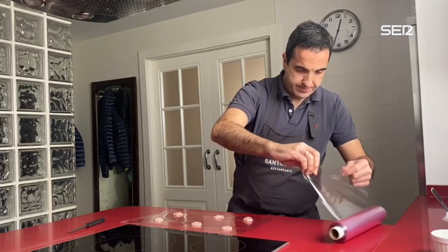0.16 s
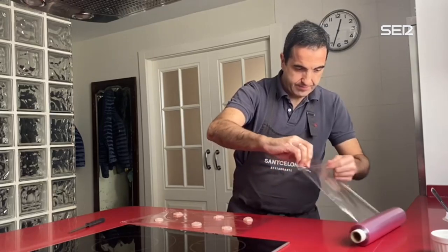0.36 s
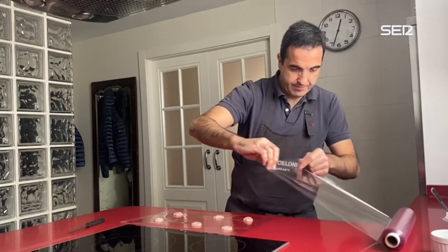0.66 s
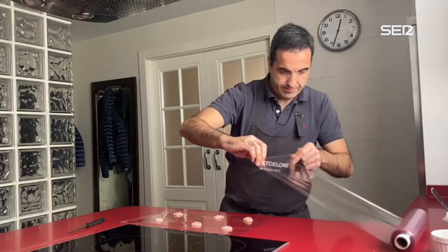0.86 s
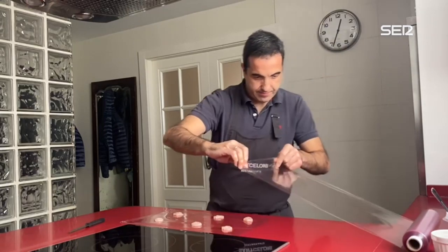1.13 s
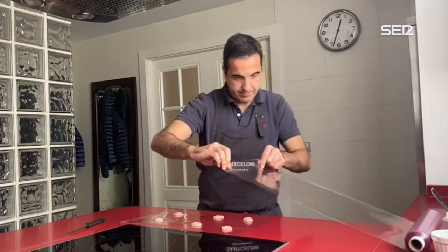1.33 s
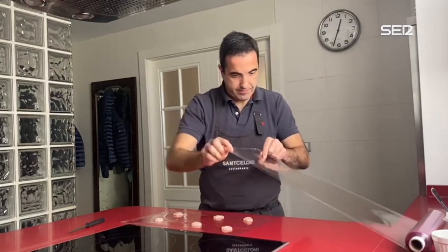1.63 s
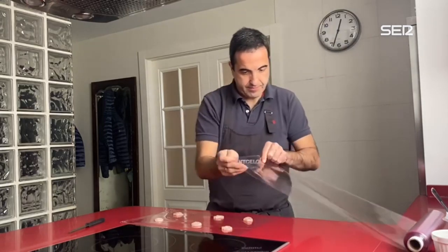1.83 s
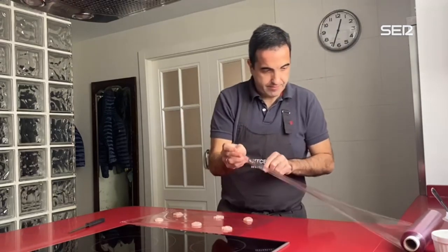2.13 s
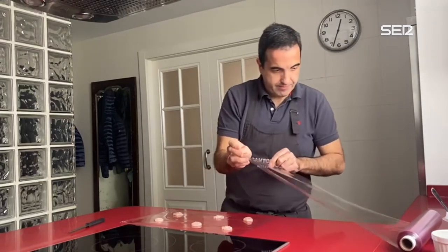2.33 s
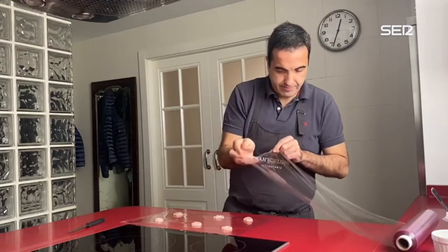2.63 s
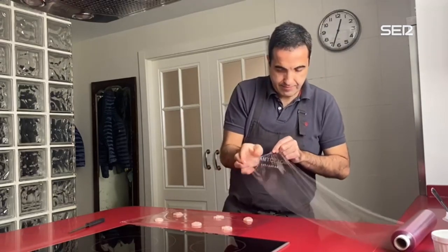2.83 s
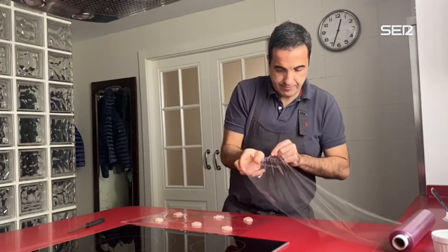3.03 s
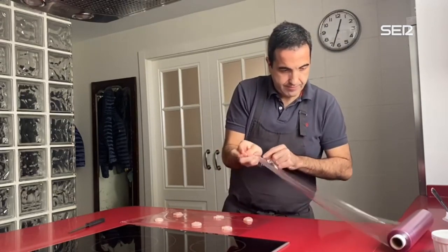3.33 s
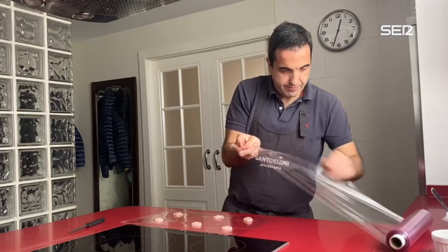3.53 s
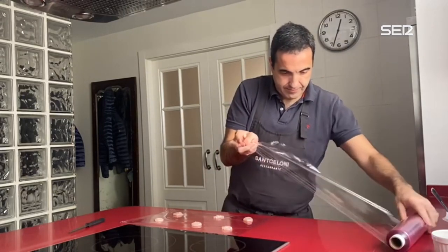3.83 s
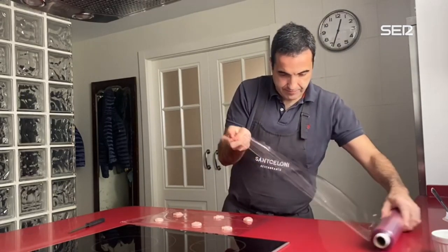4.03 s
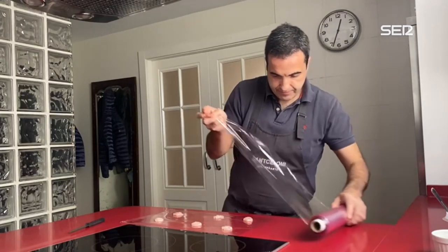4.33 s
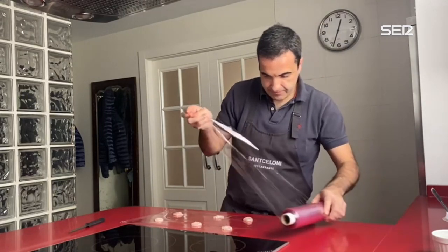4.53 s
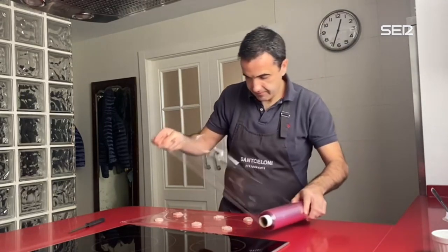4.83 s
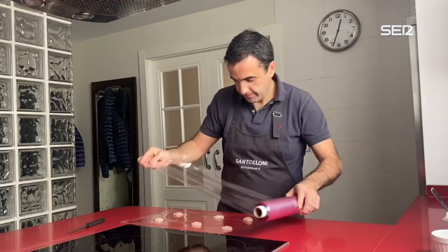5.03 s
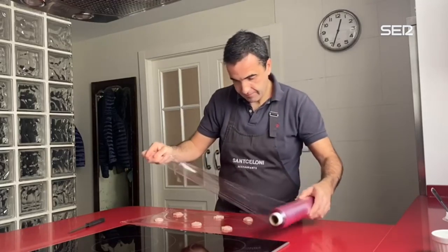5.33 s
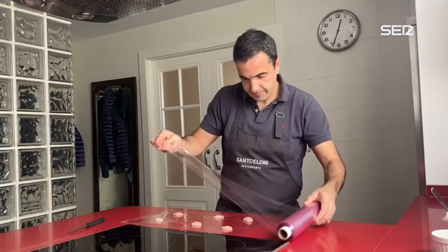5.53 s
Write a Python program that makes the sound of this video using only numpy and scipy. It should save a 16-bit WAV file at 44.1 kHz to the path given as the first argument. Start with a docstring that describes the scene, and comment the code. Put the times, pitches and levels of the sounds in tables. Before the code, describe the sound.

Thin plastic film crinkles, snaps and tears loose in a hard-walled kitchen, with dull roll thuds and a steady low hum.

```python
"""Hard-walled kitchen: cling film is pulled off its roll and stretched between two hands.
An extractor hums (wavering sines) and rumbles (shaped noise); the roll knocks on the worktop (pushed modes).
Short pitched pops and groans (click bunches ringing at one pitch) are the roll's tube, later the sheet.
The film crinkles (dense filtered clicks) and snaps loose (crack and tear).
Two close microphone ports hear it, with a noise-tail room."""
import sys
import numpy as np
from scipy import signal
from scipy.fft import rfft, irfft, next_fast_len
from scipy.io import wavfile
from scipy.ndimage import uniform_filter1d

SR = 44100
rng = np.random.default_rng(int(sys.argv[2]) if len(sys.argv) > 2 else 0)


def digitize_waveform(pressure):
    """Quantize a signal to 16-bit integers and store it at the path in sys.argv[1].

    Rows of a 2-D input are taken as channels; values are limited to [-1, 1].
    """
    field = np.atleast_2d(pressure).T
    bounded = np.clip(field, -1, 1)
    quanta = np.round(bounded * 32767).astype(np.int16)
    wavfile.write(sys.argv[1], SR, quanta)


N = 250949


def undb(db):
    """dB to amplitude ratio."""
    return 10 ** (np.asarray(db) / 20)


def unit(x):
    """Scale to rms 1."""
    return x / np.sqrt(np.mean(x ** 2))


def over_hz(table, size):
    """(f/Hz, value) table interpolated over log frequency at the bins of a transform."""
    hz, value = np.transpose(table)
    return np.interp(np.log(np.fft.rfftfreq(size, 1 / SR) + 1), np.log(hz), value)


def colour(x, table):
    """Minimum-phase filter with the gains of an (f/Hz, level/dB) table."""
    cepstrum = irfft(np.log(undb(over_hz(table, size=4096))))
    cepstrum[1:2048] *= 2  # fold to causal
    cepstrum[2049:] = 0
    impulse = irfft(np.exp(rfft(cepstrum)))[:2048]
    return signal.fftconvolve(x, impulse)[:len(x)]


def walk(rate_hz):
    """Random levels held 1 / rate_hz and smoothed twice; rms 1."""
    hold = int(SR / rate_hz)
    steps = np.repeat(rng.standard_normal(N // hold + 1), hold)
    smooth = uniform_filter1d(uniform_filter1d(steps, hold), hold)
    return unit(smooth[:N])


# extractor motor lines: (mean f/Hz, waver rms/Hz, level/dB rms before waver)
HUM_LINES = [(133.77, 1.02, -52.5), (97, 2.185, -63.5), (210.5, 2.806, -77.5), (281, 4.17, -78),
             (547, 7.5, -91.5)]


def hum():
    """Motor lines that waver in pitch and level."""
    out = 0
    for hz, waver_hz, db in HUM_LINES:
        level = np.sqrt(2) * undb(db + 2.0 * walk(8))
        cycles = np.cumsum(hz + waver_hz * walk(6)) / SR
        out = out + level * np.sin(2 * np.pi * cycles)
    return out


# extractor air noise spectrum: (f/Hz, relative level/dB per Hz)
AIR_SPECTRUM = [(15, -47), (25, -11), (80, -6), (109, -6), (132, 1), (157, -14.5), (185, -11.5), (236, -20),
                (370, -17), (487, -21.5), (716, -33.5), (1480, -47.5), (3970, -55.5), (8000, -60),
                (10400, -101)]
AIR_DB, AIR_SWELL_DB, FLUTTER_DB = -57, 0.87, 1.6


def rumble():
    """Extractor air noise: shaped noise swelling a little, its upper part fluttering."""
    size = next_fast_len(N)
    air = rfft(rng.standard_normal(size)) * undb(over_hz(AIR_SPECTRUM, size))
    upper_share = over_hz([(170, 0), (260, 1)], size)
    lower = irfft(air * (1 - upper_share), size)[:N]
    upper = irfft(air * upper_share, size)[:N]
    noise = lower + upper * undb(FLUTTER_DB * walk(17))
    return unit(noise) * undb(AIR_DB + AIR_SWELL_DB * walk(2.07))


# room decay: (f/Hz, t60/s)
DECAY_T60 = [(100, 0.77), (500, 0.44), (2000, 0.33), (6000, 0.4), (12000, 0.15)]
ROOM_DB, ROOM_BUILD_S = 8, 0.00041


def room(x):
    """Tiled walls: a noise tail whose octaves die at their own pace."""
    t_s, tail = np.arange(SR) / SR, 0
    hz, t60_s = np.transpose(DECAY_T60)
    spectrum = rfft(rng.standard_normal(SR))
    bin_octave = np.log2(np.arange(SR // 2 + 1) + 1.)
    for octave in range(5, 15):
        weight = np.clip(1 - np.abs(bin_octave - octave), 0, 1)
        band = irfft(spectrum * weight, SR)
        band_t60_s = np.interp(octave, np.log2(hz), t60_s)
        tail = tail + band * np.exp(-np.log(1000) * t_s / band_t60_s)
    tail = tail * (1 - np.exp(-t_s / ROOM_BUILD_S))
    return undb(ROOM_DB) * signal.fftconvolve(x, tail / np.sqrt(np.sum(tail ** 2)))[:N]


# roll on worktop: (t/s, ring peak level/dB before mix, contact/ms, tube-rim tick level/dB re ring peak)
ROLL_KNOCKS = [(.003, -56, 14, -60), (0.129, -51, 12.5, -60), (0.383, -41, 0.4, -36),
               (.4, -46.5, 13.6, -60), (0.717, -48, 9.2, -60), (0.799, -55, 12.7, -60),
               (.905, -46.5, 11.2, -60), (.93, -52, 2.6, -40), (1.226, -53, 10.3, -60),
               (1.422, -46.5, 6.4, -39), (3.771, -48, 4.7, -47), (4.071, -42.5, 4.6, -38),
               (4.111, -44.5, 7.4, -39), (5.533, -36.5, 0.57, -17.5), (5.54, -35, 2.3, -29),
               (5.548, -38, 8, -23), (5.565, -41.5, 1.27, -20.5), (5.593, -42, 4.4, -24),
               (5.612, -46.5, 3.5, -20), (5.644, -55.5, 5.6, -15)]
# worktop modes, before each blow's variation: (f/Hz, level/dB, t60/s, at least 0.02 s in use)
WORKTOP_MODES = [(69, -10, 0.31), (87.7, -9, 0.24), (124.4, -12.5, 0.29), (156.1, -3.5, 0.16),
                 (192.3, -2, 0.093), (214.7, 0.5, 0.13), (274, -3.5, 0.089), (322, -7, 0.082),
                 (369, -1.5, 0.063), (430.5, -10.5, 0.14), (503, -5, 0.07), (570, -23, 0.024),
                 (639, -2, 0.083), (754, 1, 0.072), (851, -7, 0.066), (968, -6.5, 0.042),
                 (1303, -17.5, 0.091)]
# tube-rim tick filter: (f/Hz, level/dB)
RIM_COLOUR = [(900, 18), (1200, 4.5), (2120, 0.5), (2900, -4), (3500, -5), (3790, 2.5), (4100, -5.5),
              (5500, -9.5), (9000, -20)]


def knocks(build_cycles=0.84, vary_db=2., detune_share=.025, tick_decay_s=0.024):
    """A half-sine push rings the worktop; longer contact leaves high modes out, low modes build up late."""
    out, t_s = np.zeros(N + SR), np.arange(SR // 4) / SR
    modes = len(WORKTOP_MODES)
    chance = rng.standard_normal((len(ROLL_KNOCKS), 2 * modes + 1024))
    for (s, db, contact_ms, tick_db), draws in zip(ROLL_KNOCKS, chance):
        ring = 0  # each blow lands elsewhere: mode levels and pitches differ
        for (hz, mode_db, t60_s), vary, detune in zip(WORKTOP_MODES, draws, draws[modes:]):
            tone = np.sin(2 * np.pi * hz * (1 + detune_share * detune) * t_s)
            decay = np.exp(-np.log(1000) * t_s / max(t60_s, .02))
            build = 1 - np.exp(-t_s * hz / build_cycles)
            ring = ring + undb(mode_db + vary_db * vary) * tone * decay * build
        push = np.sin(np.pi * np.clip(1000 * t_s[:1024] / contact_ms, 0, 1))
        ring = signal.fftconvolve(ring, push)[:len(t_s)]
        ring = ring / np.abs(ring).max()
        tick = draws[-1024:] * np.exp(-t_s[:1024] / tick_decay_s)
        ring[:1024] += undb(tick_db) * colour(tick, RIM_COLOUR)
        start = int(s * SR)
        out[start:start + len(t_s)] += undb(db) * ring
    return out[:N]


# short pitched pops and groans: the roll's tube rattling at the start, the stretched sheet drumming later:
# (t/s, level/dB before mix, f/Hz, length/ms)
POP_EVENTS = [(0.022, -50.5, 870, 18), (.072, -42.5, 756, 9.3), (0.09, -48, 890, 3.6),
              (.152, -50, 935, 5.5), (.162, -44, 767, 3), (1.369, -63, 1190, 47), (1.4, -52.5, 1350, 40),
              (1.44, -55.5, 890, 40), (1.47, -55.5, 970, 29), (1.445, -75, 520, 21), (4.669, -64, 1920, 13)]


def pitched_pops(width=0.19, per_s=760.0, spread_db=1.5, size=4096):
    """Bunches of uneven clicks ring a damped resonance: tube rattling at the start, sheet drumming later."""
    out, ms = np.zeros(N + size), 1000 * np.arange(size) / SR
    chance = rng.random((len(POP_EVENTS), 2, size))
    for (s, db, hz, length_ms), (when, big) in zip(POP_EVENTS, chance):
        clicks = (when < per_s / SR) * undb(-spread_db * np.log(big + 0.024))
        clicks[0] += 2
        arch = np.sin(np.pi * np.clip((ms + 1) / (length_ms + 1), 0, 1))
        ring = np.sin(2 * np.pi * hz * ms / 1000) * np.exp(-np.pi * width * hz * ms / 1000)
        pop = signal.fftconvolve(clicks * arch, ring)[:size]
        level = np.sqrt(np.sum(pop ** 2) / (length_ms * SR / 1000))
        start = int(s * SR)
        out[start:start + size] += undb(db) * pop / level
    return out[:N]


# slow pulls: (t/s of fullest crinkling, level/dB before mix, brightest f/Hz, dull share/dB,
# swell/ms, fade/ms); swell and fade each span 20 dB
SHEET_PULLS = [(.01, -53, 4930, -0.5, 430, 330), (0.299, -68.5, 5000, -20, 390, 930),
               (0.549, -53, 3000, -4, 160, 42), (.72, -62, 3500, 1, 730, 190),
               (1.248, -61, 3500, -0.5, 1500, 230), (1.409, -63, 1900, 10.5, 183, 57),
               (1.479, -56, 2350, -1.5, 49, 118), (1.7, -77, 7050, 10, 510, 230),
               (2.026, -57.5, 2980, -1.5, 290, 120), (2.4, -70.5, 4530, -6, 2400, 190),
               (2.634, -61, 5400, -13.5, 290, 470), (2.8, -75.5, 5500, 2, 730, 97),
               (3.08, -65, 4500, -1.5, 40, 540), (3.29, -58.5, 4050, -10, 300, 175),
               (4.073, -60.5, 4600, -9, 235, 132), (4.2, -76.5, 3000, 7.5, 250, 42),
               (4.46, -94, 5000, -3, 250, 200), (4.7, -78.5, 3000, 6.5, 56, 190),
               (4.955, -69, 3000, 0, 23, 150), (5.01, -64, 4500, -7, 93, 48),
               (5.199, -70.5, 4500, -1, 1800, 286)]
# crinkling after a snap: level re tear, dull share re snap's own (capped), fade as multiple of tear length
SETTLE_DB, SETTLE_DULL_DB, SETTLE_PER_TEAR = -8.5, 4, 10.44
DULLEST_DB, SETTLE_SWELL_MS = 0, 1.5
OFF_PITCH_DB = 5  # bright loss per octave from the brightest pitch


def effort(patch_hz, size):
    """Bright and dull gains of one part: pulls swell and fade, every snap leaves a fading trail."""
    trails = []
    for s, _, hz, dull_db, tear_db, tear_ms in SNAP_EVENTS:
        trail_dull_db = min(dull_db + SETTLE_DULL_DB, DULLEST_DB)
        fade_ms = SETTLE_PER_TEAR * tear_ms
        trails.append((s, tear_db + SETTLE_DB, hz, trail_dull_db, SETTLE_SWELL_MS, fade_ms))
    s, db, hz, dull_db, swell_ms, fade_ms = np.array(list(SHEET_PULLS) + trails).T[:, :, None]
    steps = np.arange(0, N + size, size)
    late_ms = 1000 * (steps / SR - s)
    db = db - 20 * np.maximum(late_ms / np.maximum(fade_ms, 1), -late_ms / np.maximum(swell_ms, 1))
    bright_db = db - OFF_PITCH_DB * np.abs(np.log2(patch_hz / hz))
    return [np.interp(np.arange(N), steps, np.sqrt(np.sum(undb(v) ** 2, axis=0)))
            for v in (bright_db, db + dull_db)]


# bright film filter: (f/Hz, level/dB)
FILM_COLOUR = [(900, -9.5), (1600, -1), (2600, 0.5), (4500, -3.5), (7000, -6), (9000, -1.5), (10800, -3),
               (11800, -9)]
# dull flapping-sheet filter: (f/Hz, level/dB)
FLAP_COLOUR = [(250, -6.5), (450, -5), (700, -4.5), (1100, -5.5), (1600, -7.5), (2500, -12), (4000, -23)]


def crinkle(patch_hz, film_gain, flap_gain, per_s=500., spread_db=1.5, patchy_db=3.5):
    """Countless small patches let go in one part of the sheet: clicks of uneven size, in bunches."""
    when, size, sign = rng.random((3, N))
    clicks = (when < per_s / SR) * undb(-spread_db * np.log(size + 0.011)) * np.sign(sign - .5)
    clicks = clicks * undb(patchy_db * walk(35) + 2.55 * walk(150))
    patch = [(patch_hz / 1.76, -7), (patch_hz, 0), (patch_hz * 6.5, -7)]
    bright = colour(colour(clicks, FILM_COLOUR), patch)
    dull = colour(clicks, FLAP_COLOUR)
    return unit(bright) * film_gain + unit(dull) * flap_gain


# parts of the sheet: (f/Hz of most crinkling)
SHEET_PART_HZ = [1470, 2110, 3600, 4460, 6600, 9500]


def sheet_parts():
    """Every part of the sheet crinkles at its own pitch, driven by the shared pulls and snaps."""
    return [crinkle(hz, *effort(hz, size=128)) for hz in SHEET_PART_HZ]


# film snapping loose: (t/s, crack peak level/dB before mix, brightest f/Hz, dull share/dB,
# tear level/dB before mix, tear decay/ms)
SNAP_EVENTS = [(0.026, -50, 1800, 14, -63, 3), (0.072, -43, 2200, 5, -55.5, 6.2),
               (0.089, -57, 1586, 10.5, -52, 6.4), (0.151, -47, 2090, 3, -51.5, 7.2),
               (0.365, -58, 6080, -7, -49.5, 27), (.379, -24, 4400, -5, -30.5, 7),
               (.53, -59, 2300, -5.5, -49, 40), (0.621, -57, 3680, -38, -46.5, 16),
               (.683, -54, 3050, -28, -50.5, 21), (0.7087, -57, 3500, -18, -44.5, 8.5),
               (0.8709, -45, 6800, -5.5, -52, 23), (1.337, -41, 4150, -32, -50.5, 46),
               (1.422, -41, 1400, 10, -61, 3.6), (1.454, -57, 1600, 7, -57, 5),
               (1.8, -35, 3930, -2, -44, 3.5), (1.9381, -48, 2200, 6, -61.5, 13),
               (2.108, -41, 4270, -7, -47.5, 5.1), (2.189, -54, 3840, -3, -42.5, 5.1),
               (2.411, -62, 2370, -10, -58.5, 5.7), (2.615, -65, 2300, -2, -58, 12),
               (2.705, -68, 3070, -5, -56, 14.5), (2.782, -50, 5300, -11, -54, 7.7),
               (3.065, -63, 4970, -22, -62.5, 12), (3.139, -33.5, 4960, -12.5, -46, 31),
               (3.289, -55, 4600, -10, -49.5, 6.7), (3.516, -62, 2980, -32, -52.5, 10),
               (3.529, -29, 7300, -13.5, -46, 26), (3.856, -68, 7000, -18, -61, 3.9),
               (3.875, -40, 3020, -13.5, -49.5, 7.9), (3.897, -51, 6700, -16, -51, 11),
               (4.669, -66, 1900, 2, -69, 12), (4.94, -67, 3000, -1, -74, 14),
               (5.157, -69, 4300, -13, -59.5, 6.9), (5.205, -63, 2500, -4, -64, 9.3),
               (5.238, -68, 3000, -5, -72, 5.5)]


def snaps(crack_ms=0.22, rise_ms=0.51, late_ms=1.0, fray=0.19, size=8192):
    """Each snap: a sub-millisecond crack and a tear running on, coloured by the patch that lets go."""
    cracks, tears, ms = np.zeros(N + size), np.zeros(N + size), 1000 * np.arange(size) / SR

    def voiced(raw, patch, dull_db):
        bright = colour(colour(raw, FILM_COLOUR), patch)
        return unit(bright) + undb(dull_db) * unit(colour(raw, FLAP_COLOUR))

    chance = rng.standard_normal((len(SNAP_EVENTS), size))
    for (s, db, hz, dull_db, tear_db, tear_ms), hiss in zip(SNAP_EVENTS, chance):
        off_ms = np.abs(ms - late_ms)
        click = (off_ms < 500 / SR) + fray * hiss  # within half a sample
        raw_crack = (click * np.exp(-off_ms / crack_ms))[:size // 8]
        raw_tear = hiss * np.exp(-ms / tear_ms) * (1 - np.exp(-ms / rise_ms))
        crack_patch = [(hz / 5, -22), (hz / 2.0, -9), (hz, 0), (hz * 0.95, -4), (hz * 5, -12)]
        tear_patch = [(hz / 3, -9), (hz, 0), (hz * 3, -4)]
        crack = voiced(raw_crack, crack_patch, dull_db)
        tear = voiced(raw_tear, tear_patch, dull_db)
        start = int(s * SR)
        cracks[start:start + len(crack)] += undb(db) * crack / np.abs(crack).max()
        tears[start:start + size] += undb(tear_db) * tear * np.std(raw_tear)
    return cracks[:N], tears[:N]


# diffuse sound at the two ports: (f/Hz, left-right correlation before balance and phase turns)
PORT_LIKENESS = [(60, 1), (160, 0.903), (300, -0.045), (600, 0.051), (1250, -0.49), (2700, 0.32),
                 (5000, 0.35), (6500, 0.6), (8300, 1), (12000, 1)]
# left-right phase difference: (f/Hz, phase/cycles); the channels are in opposite phase around 9 kHz
PHASE_TURNS = [(7550, 0), (7900, .16), (8350, .5), (9560, .5), (10450, 1), (11900, 1), (12400, 1.5)]
# channel balance: (f/Hz, left minus right level/dB)
PORT_BALANCE = [(250, 0), (500, 2), (1000, -0.5), (2000, 0.5), (4000, 2), (9000, 0.5), (11000, -0.5),
                (11700, -0.5)]


def ports(direct, diffuse_one, diffuse_two):
    """Both ports share the direct sound; the diffuse part is alike only where the table says so."""
    edge = SR // 8  # the sound runs on beyond both ends
    size = next_fast_len(N + SR // 2)
    near, one, two = (rfft(np.pad(v, edge, "reflect", reflect_type="odd"), size)
                      for v in (direct, diffuse_one, diffuse_two))
    like = np.clip(over_hz(PORT_LIKENESS, size), -1, 1)
    mid, side = np.sqrt((1 + like) / 2) * one, np.sqrt((1 - like) / 2) * two
    tilt = undb(over_hz(PORT_BALANCE, size) / 2)
    turn = np.exp(-2j * np.pi * over_hz(PHASE_TURNS, size))
    left = irfft((near + mid + side) * tilt * turn, size)
    right = irfft((near + mid - side) / tilt, size)
    return np.array([left, right])[:, edge:edge + N]


def scene():
    """Mix direct sources and two draws of the diffuse field, then feed the ports."""
    sheet = sheet_parts()
    (cracks, tears), blows, pops = snaps(), knocks(), pitched_pops()
    direct = hum() + undb(3.0) * blows + undb(-6.0) * pops
    direct = direct + undb(-9.5) * sum(sheet) + undb(-4.5) * tears + undb(5.0) * cracks
    # each source, and each part of the sheet, excites the room from its own place
    places = [undb(-9.5) * colour(blows, [(70, -16.5), (300, 1.0)]), undb(-13.0) * pops]
    places += [undb(-17.5) * part for part in sheet]
    places += [undb(-11.5) * tears, undb(-9.0) * cracks]
    diffuse_one, diffuse_two = (sum(room(v) for v in places) + rumble() for _ in range(2))
    return ports(direct, diffuse_one, diffuse_two)


TOP_HZ, BASS_HZ = 11900, 45


def record(dry):
    """The recorder drops the deepest bass and cuts the top."""
    thin = signal.sosfilt(signal.butter(2, BASS_HZ, "high", fs=SR, output="sos"), dry)
    return signal.sosfilt(signal.ellip(10, .2, 70, TOP_HZ, fs=SR, output="sos"), thin)


dry = scene()
out = record(dry)
digitize_waveform(out)
```